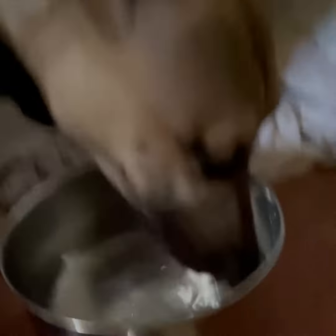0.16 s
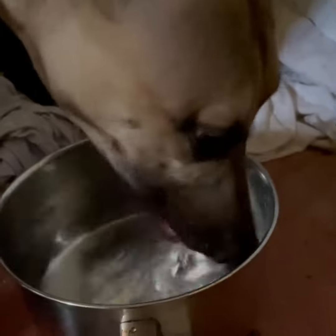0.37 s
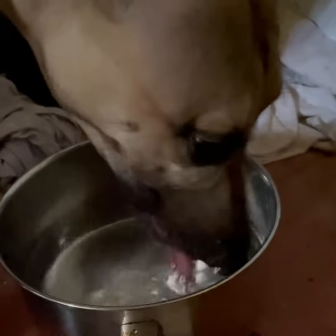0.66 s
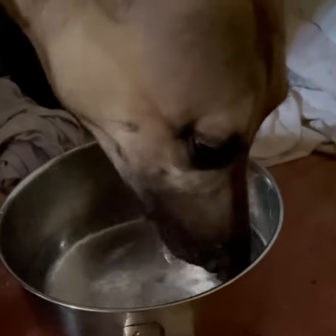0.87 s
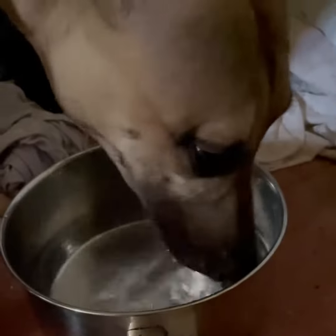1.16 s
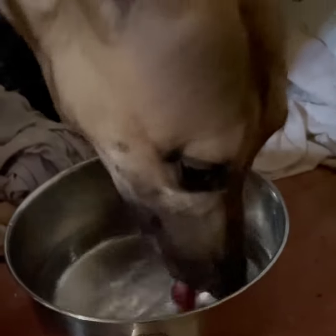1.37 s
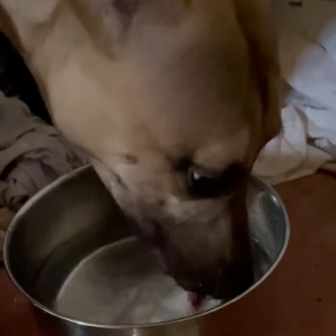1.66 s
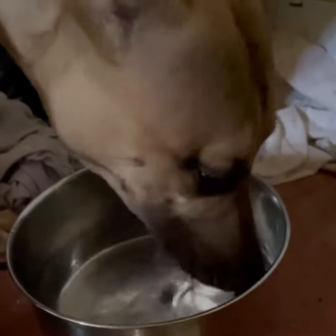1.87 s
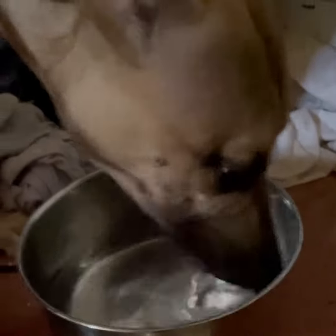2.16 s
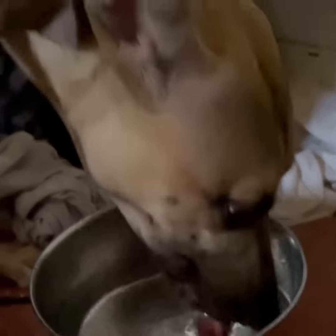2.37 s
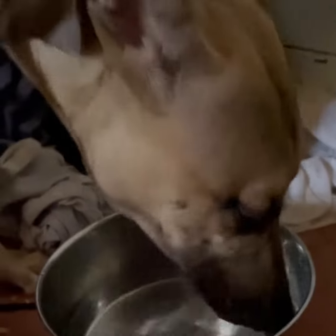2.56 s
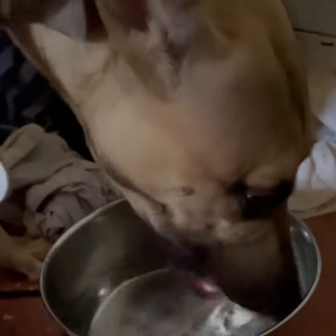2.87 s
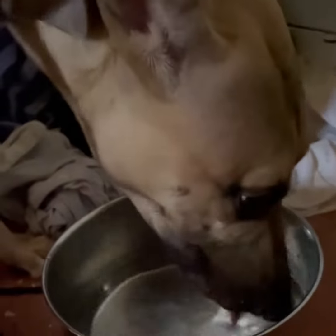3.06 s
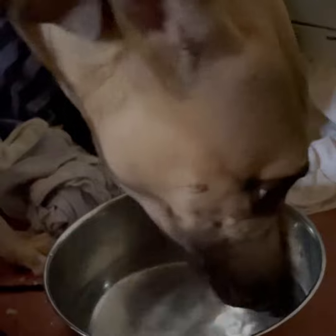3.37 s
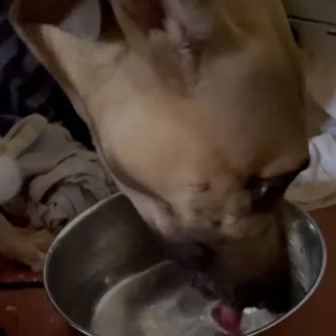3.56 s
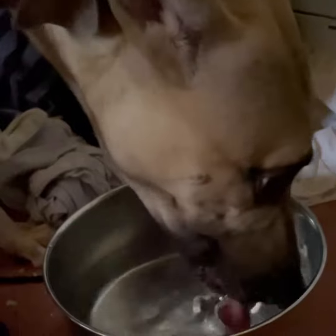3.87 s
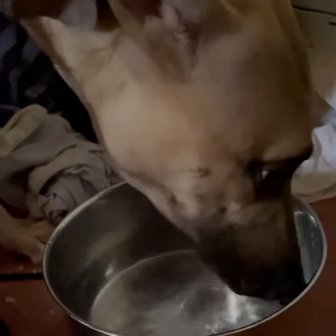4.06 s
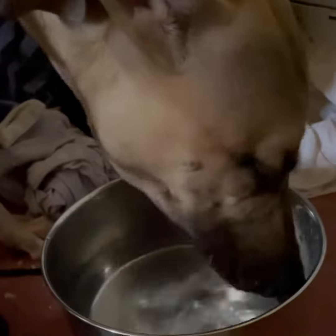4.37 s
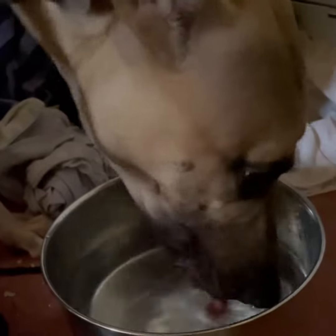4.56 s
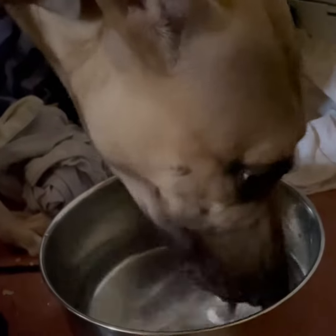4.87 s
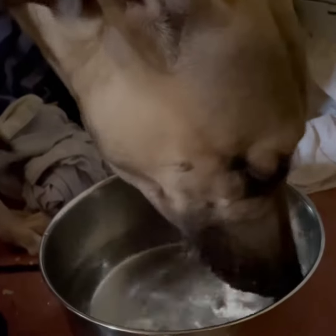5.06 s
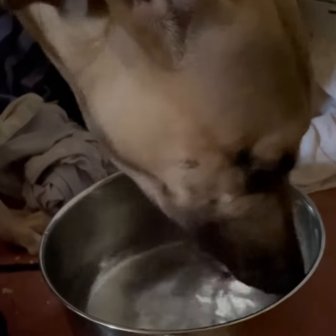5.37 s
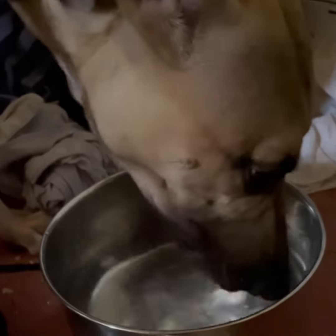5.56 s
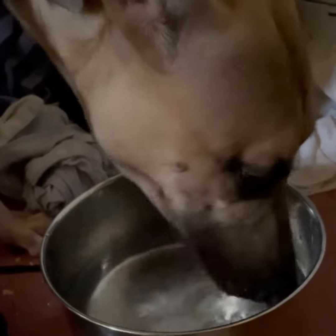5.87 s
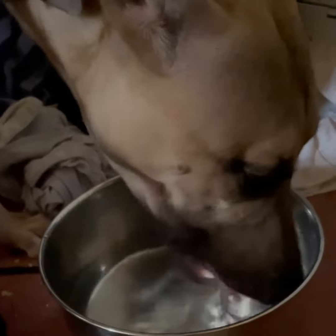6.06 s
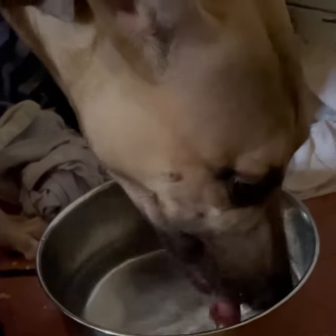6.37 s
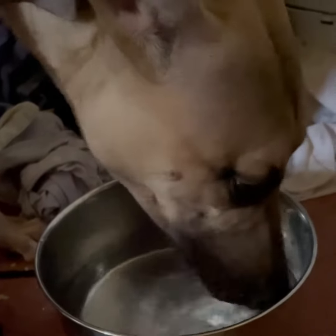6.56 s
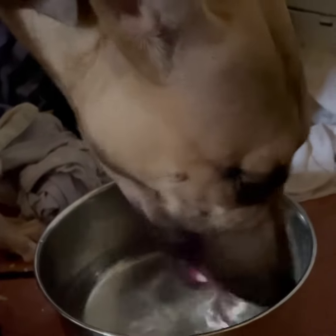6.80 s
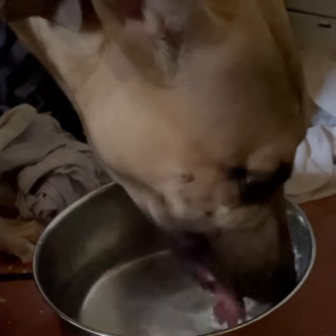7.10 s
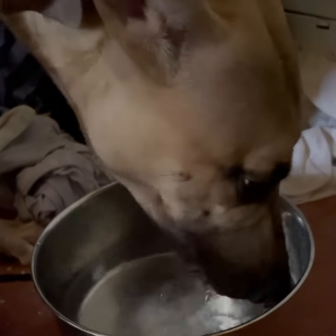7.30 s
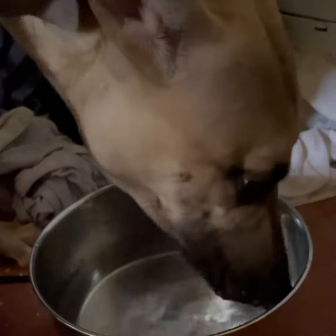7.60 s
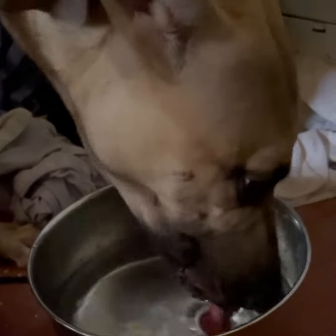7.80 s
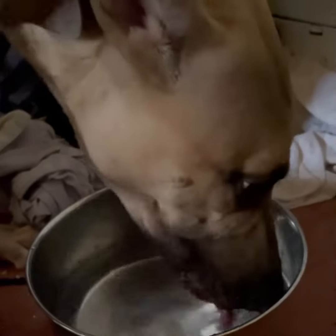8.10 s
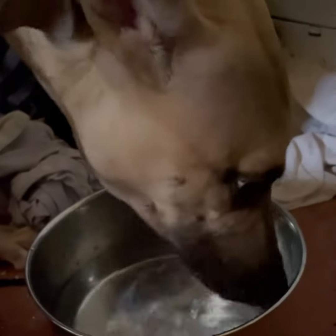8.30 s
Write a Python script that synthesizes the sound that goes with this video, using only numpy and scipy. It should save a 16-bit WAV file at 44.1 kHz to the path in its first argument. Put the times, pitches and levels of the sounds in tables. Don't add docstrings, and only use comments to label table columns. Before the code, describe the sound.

Rhythmic wet lapping begins at once and continues throughout, lighter and more uneven in the first second or so, then fuller and splashier. Each lap is a short burst of slosh, slurp and crisp smack, draining quickly into tiny drips and fine spray on steel. Low glugs and dull bowl knocks sit beneath. Close stereo microphone, small quiet room, soft constant hum, short tight echo from the bowl.

```python
import sys
import numpy as np
from scipy import signal
from scipy.fft import rfft, irfft
from scipy.io import wavfile
from scipy.ndimage import uniform_filter1d, minimum_filter1d, map_coordinates

SR = 44100
rng = np.random.default_rng(int(sys.argv[2]) if len(sys.argv) > 2 else 0)


def magnitude_from_level(level_db):
    exponent = np.asarray(level_db, float) / 20
    return 10 ** exponent


def log_audio(samples):
    frames = np.atleast_2d(samples).T
    limited = np.clip(frames, -1, 1)
    pcm = np.round(limited * 32767).astype(np.int16)
    wavfile.write(sys.argv[1], SR, pcm)


N = 372204


def evened(x):
    return x / np.sqrt(np.mean(x ** 2) + 1e-20)


def read(points, hz):
    point_hz, value = np.transpose(points)
    return np.interp(np.log(hz + 1), np.log(np.abs(point_hz) + 1), value)


def coloured(x, points):
    hz = np.fft.rfftfreq(x.shape[-1], 1 / SR)
    return irfft(rfft(x) * magnitude_from_level(read(points, hz)), x.shape[-1])


def add(mix, start_s, sound):
    part = mix[max(round(start_s * SR), 0):][:len(sound)]
    part += sound[:len(part)]


def air_pocket(hz, cycles, glide, rise):
    cycles = max(cycles, 1)
    u = np.arange(int(6 * SR * cycles / hz)) * hz / SR / cycles
    shape = (1 - np.exp(-(u / rise) ** 2)) * np.exp(-1.4 * u - 0.51 * u ** 2)
    return shape / shape.max() * np.sin(2 * np.pi * cycles * (u + glide * u ** 2 / 2))


def pockets(rows, cycles, glide, rise, trim_db):
    out = np.zeros(N)
    for start_s, level_db, pitch_hz, *own in rows:
        length = own[0] if own else cycles
        add(out, start_s, magnitude_from_level(level_db + trim_db) * air_pocket(pitch_hz, length, glide, rise))
    return out


def swarm(lo_hz, hi_hz, cycles, per_s, spread_db, clumpy):
    out = np.zeros(N)
    clump = np.exp(clumpy * evened(uniform_filter1d(rng.standard_normal(N), 400)))
    for hz in lo_hz * (hi_hz / lo_hz) ** ((np.arange(18) + rng.random(18)) / 18):
        draw, size, sign = rng.random((3, N))
        train = (draw < clump * per_s / 18 / SR) * np.sign(sign - .5)
        train *= magnitude_from_level(-spread_db * np.log(size + .02))
        pocket = air_pocket(hz, cycles, glide=0.1, rise=0.25) * np.sqrt(hz / lo_hz)
        out += signal.oaconvolve(train, pocket)[:N]
    sway_hz, sway_samples = 2.3, 220
    bent = np.arange(N) + sway_samples * np.sin(2 * np.pi * sway_hz * np.arange(N) / SR)
    return evened(map_coordinates(out, [bent], order=3, mode="mirror"))


# [plunge_s, length_s, slosh_db, spray_db]
LAPS = [(0.01, 0.047, -59.5, -57.5), (0.174, 0.052, -66, -64.5), (0.289, 0.1, -59, -59),
        (0.536, 0.024, -67, -61.5), (0.641, 0.083, -60, -54.5), (0.961, 0.11, -60, -57.5),
        (1.279, 0.025, -61, -66), (1.37, 0.132, -57, -57.5), (1.681, 0.15, -54.5, -57),
        (2.061, 0.082, -52.5, -56), (2.383, 0.11, -54, -52), (2.687, .21, -58, -57.5),
        (3.113, 0.12, -55, -57.5), (3.427, 0.0073, -59, -65.5), (3.541, 0.11, -54.5, -52),
        (3.871, 0.096, -55.5, -53), (4.21, 0.093, -58, -57), (4.516, 0.022, -59, -62.5),
        (4.619, 0.093, -56.5, -54), (4.947, 0.088, -60.5, -53), (5.283, 0.076, -56, -51.5),
        (5.567, 0.2, -54.5, -52.5), (5.986, 0.11, -57.5, -54), (6.359, 0.092, -52.5, -56),
        (6.667, 0.15, -54.5, -58), (7.01, 0.15, -55.5, -55.5), (7.41, 0.1, -56, -55),
        (7.722, 0.15, -66.5, -55), (7.906, 0.027, -58.5, -57.5), (8.148, 0.1, -56.5, -53)]


def strokes(column, rule, rest_db):
    rise_db_per_s, drain_db_per_s, sag_db, lift_db, reach_db = rule
    curl_s, reach_s, reach_width_s = 0.1, 0.065, 0.04
    t = np.arange(0, N + 64, 64) / SR
    power = magnitude_from_level(rest_db) ** 2
    for row in LAPS:
        since = t - row[0]
        stroke_s = max(row[1], .03)
        length_s = stroke_s + 0.014
        done = np.clip(since / length_s, 0, 1)
        db = lift_db * done - sag_db * np.sin(np.pi * done * round(stroke_s / curl_s)) ** 2
        db += rise_db_per_s * np.minimum(since, 0) - drain_db_per_s * np.maximum(since - length_s, 0)
        reach = magnitude_from_level(reach_db) * np.exp(-((since + reach_s) / reach_width_s) ** 2)
        power = power + magnitude_from_level(row[column]) ** 2 * (magnitude_from_level(db) ** 2 + reach ** 2)
    return np.interp(np.arange(N) / SR, t, np.sqrt(power))


# [time_s, level_db]
SWELL = [(.1, -62.5), (.6, -71), (.87, -73.5), (1.0, -65.5), (1.93, -65.5), (2.33, -68), (2.55, -55.5),
         (2.95, -56.5), (3.3, -71), (3.67, -63.5), (4.14, -73), (4.56, -66), (5.04, -60.5), (5.78, -58.5),
         (5.92, -69.5), (6.1, -65), (7.82, -61.5), (8.44, -71.5)]


def swell():
    return magnitude_from_level(np.interp(np.arange(N) / SR, *np.transpose(SWELL)))


# [rise_db_per_s, drain_db_per_s, sag_db, lift_db, reach_db]
SLOSH_RULE = (897, 249, 10, -0.5, -14.5)
# [freq_hz, gain_db]
SLOSH_COLOUR = [(550, -10.5), (820, -2.5), (1170, 3), (1500, -1.5), (1850, 1.5), (2600, 0), (3500, 3.5)]
# [rise_db_per_s, drain_db_per_s, sag_db, lift_db, reach_db]
SPRAY_RULE = (1298, 343, 7, -0.5, -17.5)
# [freq_hz, gain_db]
SPRAY_COLOUR = [(2200, -2), (3200, -3.5), (5500, -1), (7500, -12.5), (10500, -1), (12800, -9.5),
                (14200, -11.5), (15500, -5)]


def slosh_and_spray():
    slosh = coloured(swarm(700, 2800, cycles=9, per_s=600, spread_db=2.2, clumpy=.9), SLOSH_COLOUR)
    deep = signal.sosfiltfilt(signal.butter(4, 1000, fs=SR, output="sos"), slosh)
    slosh = slosh - deep + deep * evened(swell() ** 0.64)
    drips = swarm(2600, 7000, cycles=12, per_s=400, spread_db=2.6, clumpy=.8)
    fizz = swarm(2600, 15500, cycles=5, per_s=2600, spread_db=2.8, clumpy=.75)
    mist = rng.standard_normal(N)
    slow = uniform_filter1d(uniform_filter1d(mist, size=300), size=300)
    gust = magnitude_from_level(2.5 * evened(slow))
    slosh = evened(gust * slosh)
    spray = evened(coloured(gust * (fizz + 0.54 * drips + 0.041 * mist), SPRAY_COLOUR))
    slosh_level = magnitude_from_level(1.5) * strokes(2, SLOSH_RULE, rest_db=-73)
    return slosh_level * slosh + strokes(3, SPRAY_RULE, rest_db=-77.5) * spray


# [start_s, level_db, pitch_hz, cycles]
GULPS = [(0.06, -38, 1060, 2.4), (0.282, -40.5, 1340, 3.2), (0.363, -48, 540, 5), (0.721, -48, 568, 10.8),
         (1.473, -40, 1304, 21), (1.809, -47, 838, 18), (2.067, -39.5, 1380, 5.7),
         (2.382, -31.5, 1160, 9.3), (2.709, -38.5, 1090, 6.1), (2.815, -45, 1320, 4.8),
         (3.118, -39, 1170, 8.3), (3.451, -41.5, 1200, 3.6), (3.54, -32.5, 1070, 2.4),
         (4.624, -37, 957, 8.1), (4.69, -41.5, 813, 11.5), (5.006, -46, 840, 3.9), (5.344, -42, 810, 5.5),
         (5.574, -34.5, 955, 3.2), (5.658, -37, 560, 5.5), (5.991, -32, 1040, 0.74),
         (6.357, -37.5, 970, 7.9), (6.463, -34.5, 580, 2.8), (6.663, -37, 1180, 1.7),
         (6.825, -45.5, 772, 9.5), (7.073, -39, 1440, 4.5), (7.51, -44.5, 1040, 4),
         (7.725, -34.5, 1224, 7.6), (7.808, -36, 557, 4), (7.902, -40.5, 846, 8.5),
         (8.181, -40.5, 1220, 3.2),
         (1.12, -34, 4770, 20), (1.126, -50, 4600, 67), (1.6762, -31, 1810, 5.8), (1.679, -49, 1770, 16),
         (1.68, -58, 2000, 67), (1.831, -43.5, 233, 6.1), (2.395, -38, 530, 5.8), (5.372, -55, 570, 5.9),
         (7.727, -43.5, 535, 8.2), (8.299, -50.5, 653, 8.9), (8.425, -51.5, 1770, 7.4)]


def gulps():
    return pockets(GULPS, 6, glide=0.0088, rise=0.13, trim_db=4)


# [start_s, level_db, pitch_hz]
SLURPS = [(0.2647, -53, 1220), (0.7187, -46, 760), (0.9601, -53, 1090), (1.2959, -43, 1290),
          (1.4041, -49, 1080), (1.7299, -58, 1110), (1.7668, -46, 1180), (1.8511, -43, 1220),
          (2.1674, -50, 1060), (2.4068, -35.5, 1280), (2.5061, -46.5, 1190), (2.8129, -40, 1210),
          (2.8823, -43, 1246), (3.208, -45.5, 850), (4.1983, -46.5, 1110), (4.4921, -49, 1050),
          (4.547, -41.5, 1210), (5.0184, -43, 830), (5.0369, -53, 844), (5.0503, -46.5, 1140),
          (5.6615, -30, 1054), (6.0955, -54, 804), (6.1828, -47.5, 1280), (6.3279, -44.5, 1080),
          (6.3958, -49, 1480), (6.754, -51, 1110), (6.8453, -48, 1230), (7.401, -40, 1050),
          (7.8141, -32, 1046), (7.9502, -46.7, 1105), (8.2466, -56, 780)]


def slurps():
    return pockets(SLURPS, 7.4, glide=0.034, rise=0.1, trim_db=0)


# [start_s, level_db, pitch_hz]
GLUGS = [(0.0596, -49.5, 527), (0.1923, -52, 387), (1.408, -56, 230), (1.85, -48.5, 537), (2.542, -53, 370),
         (2.5888, -50, 374), (2.7171, -43.5, 805), (5.0153, -66, 750), (5.0278, -49.5, 564),
         (5.0418, -53, 210), (5.5766, -44.5, 550), (5.6928, -57, 222), (5.7776, -49, 225),
         (6.0939, -50, 770), (6.1433, -55, 545), (6.4411, -54, 634), (6.678, -44.5, 577),
         (7.1759, -50, 590), (7.5102, -50.5, 456), (7.7511, -53, 427), (7.9546, -48, 580),
         (8.245, -50, 720)]


def glugs():
    return pockets(GLUGS, 4.36, glide=0.017, rise=0.17, trim_db=5)


# [start_s, level_db, pitch_hz]
GURGLES = [(0.027, -49, 730), (0.229, -51, 1190), (1.296, -52.5, 796), (1.367, -57.5, 567),
           (2.053, -54, 956), (2.881, -52, 804), (3.145, -48.5, 1000), (3.877, -49, 1115),
           (4.219, -46.5, 980), (4.523, -56, 1250), (4.969, -49, 1180), (5.207, -50, 1200),
           (5.248, -49.5, 1120), (5.745, -53.5, 796), (6.726, -50, 1040), (7.016, -45.5, 1410),
           (8.139, -51, 1050)]


def gurgles():
    return pockets(GURGLES, 8.1, glide=0.014, rise=0.1, trim_db=5.5)


# [start_s, level_db, pitch_hz]
BUBBLES = [(0.1771, -47.5, 1546), (0.6595, -49, 2800), (1.0291, -48, 2310), (1.3662, -52, 1730),
           (1.8326, -44, 2680), (2.371, -45.5, 2100), (2.3945, -44.5, 1870), (2.4164, -33.5, 3100),
           (2.7061, -37.5, 2060), (2.8904, -46, 2580), (3.622, -44.5, 2210), (3.8826, -33, 3040),
           (4.011, -54.5, 2000), (4.6227, -34.5, 2380), (4.6888, -47, 1870), (4.8704, -43.5, 1760),
           (5.1791, -53, 1630), (5.5704, -49.5, 2050), (5.998, -45.5, 1710), (6.2505, -56.5, 1600),
           (6.416, -44, 1680), (6.4632, -46.5, 2160), (6.6608, -45.5, 2020), (6.726, -49.5, 1380),
           (7.0188, -46, 1690), (7.0737, -57, 1840), (7.7213, -51, 1820), (7.8104, -38.5, 2080),
           (8.144, -52, 1820)]


def bubbles():
    return pockets(BUBBLES, 8.1, glide=0.064, rise=0.1, trim_db=9)


# [start_s, level_db, pitch_hz]
BURSTS = [(0.0585, -37.5, 1990), (1.2947, -48, 1490), (1.7412, -29.5, 3160), (1.7766, -30.5, 2580),
          (1.8315, -39, 1860), (2.0699, -31.5, 2760), (2.4221, -38, 1480), (2.5194, -38, 3000),
          (2.5443, -38, 2300), (2.7259, -41, 1500), (2.8292, -42, 1580), (2.8302, -39, 2340),
          (2.8506, -38.5, 2140), (3.1689, -40, 1760), (3.566, -33.5, 2620), (3.6623, -49, 2930),
          (3.8803, -48, 1550), (4.3941, -43, 1840), (4.9673, -37, 1830), (5.2048, -41.5, 1930),
          (5.7022, -38, 2230), (5.7451, -39, 1620), (5.771, -45, 1790), (6.0948, -47, 2020),
          (6.3976, -42, 1550), (6.7807, -37, 2280), (6.7987, -41, 1870), (7.0341, -42, 2080),
          (7.074, -30, 2640), (7.4387, -41.5, 1610), (7.731, -38, 2600), (7.8368, -31, 2840),
          (7.8503, -33, 2380), (8.1596, -35, 1780)]


def bursts():
    return pockets(BURSTS, 5.3, glide=0.016, rise=0.15, trim_db=-3)


# [start_s, level_db, pitch_hz]
SPECKS = [(0.2888, -32, 6130), (1.4087, -42.5, 5170), (1.7639, -37.5, 5200), (1.7794, -42.5, 3600),
          (1.7878, -42, 5650), (1.8332, -40, 5000), (2.0912, -35.5, 6400), (2.4399, -38.5, 5960),
          (2.5202, -39, 3014), (2.7277, -38.5, 3820), (2.9253, -38, 4240), (3.6631, -38, 3100),
          (3.6795, -38, 4840), (3.8721, -45, 4070), (4.2373, -38.5, 5840), (4.6294, -30, 5400),
          (4.6459, -36, 3800), (4.7167, -37.5, 5660), (4.9726, -33.5, 5180), (5.681, -38, 5500),
          (5.7049, -38, 3160), (5.7972, -36.5, 5360), (5.9833, -43, 5470), (6.0776, -40, 5600),
          (6.4478, -36.5, 4800), (6.7256, -42, 5180), (6.8653, -38.5, 3400), (7.1048, -37.5, 5700),
          (7.7318, -42.5, 3250), (7.9513, -40.5, 5100)]


def specks():
    return pockets(SPECKS, 6.4, glide=0.015, rise=0.1, trim_db=5)


# [start_s, level_db, pitch_hz]
DROPS = [(0.066, -55, 4930), (0.29, -52, 6630), (0.378, -52, 4340), (0.633, -58.5, 5660),
         (0.9625, -58, 5240), (0.9832, -54.5, 5860), (1.676, -54.5, 4950), (1.743, -57.5, 4380),
         (2.067, -56, 3530), (2.496, -54.5, 4760), (2.704, -49, 5170), (2.806, -56, 5170),
         (2.8158, -45.5, 3370), (3.4713, -57.5, 5840), (3.629, -53.5, 6400), (4.221, -57.5, 4750),
         (4.63, -45.5, 3760), (4.718, -54.5, 3820), (4.9504, -54, 3450), (5.2752, -59, 3520),
         (5.6491, -48.5, 5500), (5.683, -49, 3500), (6.0424, -51.5, 5730), (6.764, -51, 6300),
         (7.087, -52.5, 3280), (7.515, -46.5, 5360)]


def drops():
    return pockets(DROPS, 5.25, glide=0.0081, rise=0.1, trim_db=24.5)


# [start_s, level_db]
SMACKS = [(0.2872, -39), (0.3042, -31), (0.64, -41.5), (0.9844, -36.5), (1.4375, -43), (1.6776, -44.5),
          (2.0704, -36.5), (3.1486, -45), (3.238, -41.5), (3.6256, -33.5), (4.2203, -39), (5.2752, -36),
          (5.293, -35), (5.334, -49), (5.5966, -39), (6.0348, -40.5), (6.357, -46.5), (7.0187, -37),
          (7.1967, -39.5), (7.388, -34.5), (7.422, -34.5), (7.5125, -42), (7.809, -38)]
# [start_s, level_db]
TICKS = [(0.158, -48), (0.2033, -47), (0.5248, -48), (1.231, -50), (1.956, -54), (2.296, -50),
         (2.676, -38.5), (3.011, -53.5), (3.344, -49.5), (3.3918, -49.5), (3.7383, -52), (4.116, -54),
         (4.1409, -46.5), (4.4603, -51), (4.791, -51), (4.829, -54.5), (5.16, -47.5), (5.215, -44),
         (5.246, -40), (5.475, -57), (5.517, -47.5), (5.899, -54), (6.236, -49), (6.592, -52),
         (6.6214, -49), (7.003, -47), (7.3004, -52.5), (7.332, -48), (7.66, -48)]
FAINT_TICKS = [.5672, 0.8653, 2.321, 2.644, 3.8118, 3.8396, 4.892, 6.9312, 6.969, 7.3573, 7.703, 8.0403, 8.344]
MORE_TICKS = [0.38, 0.897, .921, 1.119, 1.54, 1.607, 1.7424, 3.751, 4.157, 5.069, 5.18, 5.378, 5.395, 5.546,
              6.0172, 7.0867, 8.36]
# [start_s, level_db]
SPLATS = [(0.315, -38), (0.5355, -40), (0.659, -37), (1.0203, -44), (1.1, -44), (1.4075, -41), (1.765, -41),
          (2.087, -35), (2.4148, -44), (2.4603, -43), (2.8342, -31), (3.1647, -37.5), (3.6492, -38),
          (3.658, -37), (3.681, -44), (3.8844, -43), (3.897, -35), (4.0069, -40), (4.255, -39),
          (4.6439, -45), (4.9678, -32), (5.296, -35), (6.374, -39), (6.442, -50), (6.4625, -40.5),
          (6.628, -44.5), (6.776, -40), (6.8777, -41), (7.108, -39), (7.1798, -38), (7.4427, -35),
          (7.7414, -44.5), (7.8614, -43.5), (8.1946, -38), (8.4298, -46)]
# [freq_hz, gain_db]
SMACK_COLOUR = [(1200, -47), (3000, -5.5), (4500, -1), (6000, 1), (8000, 5), (10500, 5.5), (13500, -1),
                (16000, 3)]


def smacks():
    out, t = np.zeros(N), np.arange(900) / SR
    snaps = [*SMACKS, *TICKS]
    snaps += [(start_s, -55.5) for start_s in FAINT_TICKS]
    snaps += [(start_s, level_db + 0.5) for start_s, level_db, _ in DROPS]
    snaps += [(start_s, -53) for start_s in MORE_TICKS]
    snap = (1 - np.exp(-t / .0002)) * (np.exp(-t / .0009) + .1 * np.exp(-t / .005))
    splat = (1 - np.exp(-t / 0.00094)) * np.exp(-t / 0.0012)
    films = rng.standard_normal((92, 900))
    for (start_s, level_db), fizz in zip(snaps, np.vstack([films, -films])):
        add(out, start_s, magnitude_from_level(level_db + 7.5) * fizz * snap)
    for (start_s, level_db), fizz in zip(SPLATS, films[::-1]):
        add(out, start_s, magnitude_from_level(level_db + 7.5) * fizz * splat)
    return coloured(out, SMACK_COLOUR)


# [start_s, level_db, pitch_hz]
THUMPS = [(1.498, -62, 90.5), (1.324, -58.5, 103), (1.41, -52, 94), (1.837, -57, 93), (2.126, -60, 54),
          (2.72, -44.5, 106), (2.857, -60, 91), (3.34, -50, 84.5), (3.488, -55, 97.5), (3.593, -57, 85),
          (4.404, -55.5, 94), (4.631, -51, 92), (5.465, -51.5, 94), (5.608, -60, 76.6), (5.692, -53.5, 99),
          (6.543, -51, 96), (6.689, -56, 97), (6.781, -56, 96), (7.602, -50, 94), (7.831, -52.5, 97.4)]


def thumps():
    return pockets(THUMPS, 2.63, glide=-0.0092, rise=0.42, trim_db=10.5)


# [rise_db_per_s, drain_db_per_s, sag_db, lift_db, reach_db]
RUMBLE_RULE = (306, 170, 14, 9, -23)


def rumble():
    stroke = strokes(2, RUMBLE_RULE, rest_db=-67) ** 0.67
    middle, aside = (swarm(160, 570, cycles=5.5, per_s=1100, spread_db=2, clumpy=.5) for _ in range(2))
    return swell() * evened(stroke) * (middle + 0.068 * aside * [[1], [-1]])


# [freq_hz, width_hz, gain_db]
BOWL_MODES = [(554, 110, -2), (818, 90, -2), (1170, 200, 0), (1810, 220, -2), (2200, 150, -4),
              (3500, 400, -4), (5260, 600, -3)]


def bowl(x):
    t = np.arange(SR // 8) / SR
    hz = np.fft.rfftfreq(len(t), 1 / SR)
    shift = np.array([.95, 1, 1.05])[:, None, None]
    modes = .5 + sum(magnitude_from_level(db) / (1 + (2 * (hz - f * shift) / w) ** 2) for f, w, db in BOWL_MODES)
    walls = rng.standard_normal((3, 2, len(t)))
    walls += 0.28 * walls[:, ::-1]
    echoes = irfft(rfft(walls) * modes / (1 + (hz / 12000) ** 6), len(t)) * np.minimum(t / 0.0011, 1)
    echoes *= magnitude_from_level(-60 * t / 0.012) + magnitude_from_level(-21 - 60 * t / 0.13)
    echoes /= np.linalg.norm(echoes, axis=2, keepdims=True)
    turn = np.pi * (2.9 * np.arange(N) / SR + np.arange(3)[:, None] / 3)
    fed = np.sqrt(2 / 3) * np.cos(turn) * x
    return signal.oaconvolve(fed[:, None], echoes, axes=2)[..., :N].sum(0)


# [freq_hz, gain_db]
HUM_COLOUR = [(15, -57), (25, -11), (87, 16), (714, -40), (1190, -9), (3430, -12.5), (5430, -62),
              (7710, -19), (10100, -21), (16000, -54)]


def hum():
    shared, own = rng.standard_normal(N), rng.standard_normal((2, N))
    air = evened(coloured(shared + 0.094 * own, HUM_COLOUR))
    bass = signal.sosfiltfilt(signal.butter(2, 200, fs=SR, output="sos"), air)
    return magnitude_from_level(-67.5) * (air - bass + bass * evened(swell() ** 0.85))


# [freq_hz, lead_rad]
LEAD = [(0, 0), (1030, -1.4), (2000, -0.1), (3300, 2.2), (3850, 0.3), (4310, 0.5), (5000, 5.9), (6370, 8.2),
        (7150, 9.3), (8870, 9.9), (9910, 12.2), (11700, 13.1), (13200, 14.9), (14700, 15.8), (15400, 17.05)]
# [freq_hz, tilt_db]
TILT = [(60, 2), (180, -1.5), (550, 5.5), (1650, -8.5), (4970, -1), (15000, 1)]


def ports(x):
    hz, side = np.fft.rfftfreq(N, 1 / SR), np.array([[.5], [-.5]])
    lead_rad = np.interp(hz, *np.transpose(LEAD))
    return irfft(rfft(x) * magnitude_from_level(side * read(TILT, hz)) * np.exp(1j * side * lead_rad), N)


def scene():
    water = slosh_and_spray() + gulps() + slurps() + glugs() + gurgles()
    water += bubbles() + bursts() + specks() + drops()
    low = thumps() + rumble()
    snaps = smacks()
    return ports(water + low + snaps) + magnitude_from_level(-0.5) * bowl(water + 0.5 * snaps) + ports(hum())


# [freq_hz, gain_db]
MIC = [(5500, 0), (6800, 2.5), (8500, 0), (12900, 0), (13800, 10), (14500, 2.5), (15600, 4.5), (16500, -9)]


def microphone(x):
    band = signal.firwin(511, 16700, window=("kaiser", 9), fs=SR)
    return signal.oaconvolve(coloured(x, MIC), band[None], "same")


def starve(x, under_db, quiet_db, from_hz, top_hz, snap_db):
    pair = np.array([x[0] + x[1], x[0] - x[1]]) / 2
    hz, _, z = signal.stft(pair, SR, nperseg=1024)
    z, hz = z[:, :512].reshape(2, 32, 16, -1), hz[:512:16, None]
    power = (abs(z) ** 2).sum(2) + 1e-14
    db = 10 * np.log10(uniform_filter1d(uniform_filter1d(power, size=2, axis=2), size=2, axis=1))
    treble_db = 10 * np.log10((power * (hz > from_hz)).sum((0, 1)))
    snap = treble_db - minimum_filter1d(treble_db, size=3, origin=1) > snap_db
    weak = (db < db[::-1] - under_db) | (db < quiet_db) | (hz > top_hz)
    weak = weak & (hz > from_hz) & ~snap
    z = (z * ~weak[:, :, None]).reshape(2, 512, -1)
    z = np.pad(z, ((0, 0), (0, 1), (0, 0)))
    mid, side = signal.istft(z, SR, nperseg=1024)[1][:, :N]
    return np.array([mid + side, mid - side])


def band_limit(x):
    return signal.sosfilt(signal.butter(12, 17300, fs=SR, output="sos"), x)


def record(dry):
    mix = starve(microphone(dry), under_db=4, quiet_db=-91.5, from_hz=6500, top_hz=15800, snap_db=12.5)
    return band_limit(mix)


dry = scene()
out = record(dry)
log_audio(out)
```